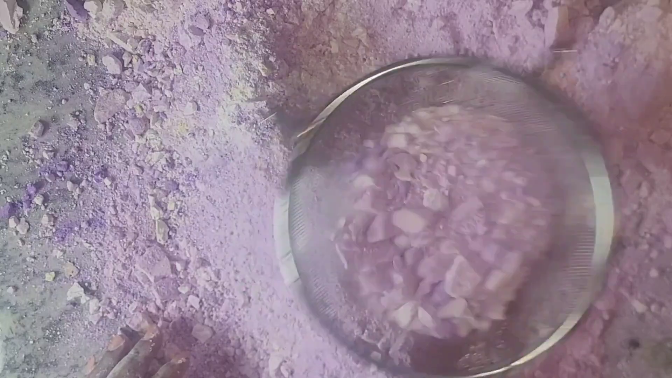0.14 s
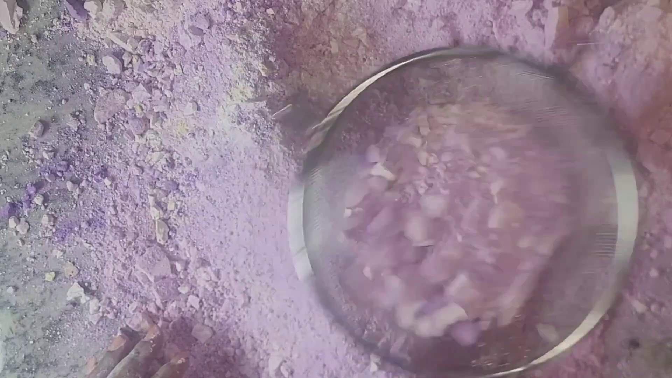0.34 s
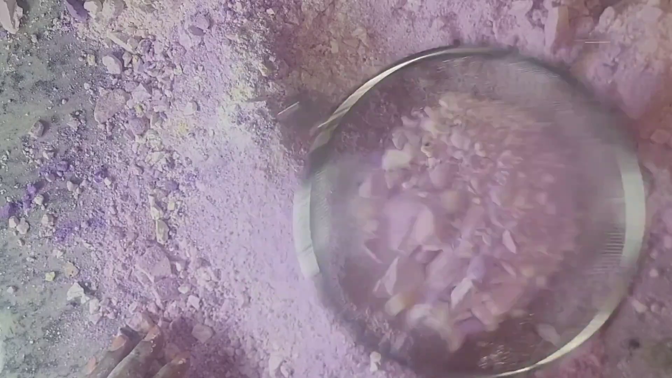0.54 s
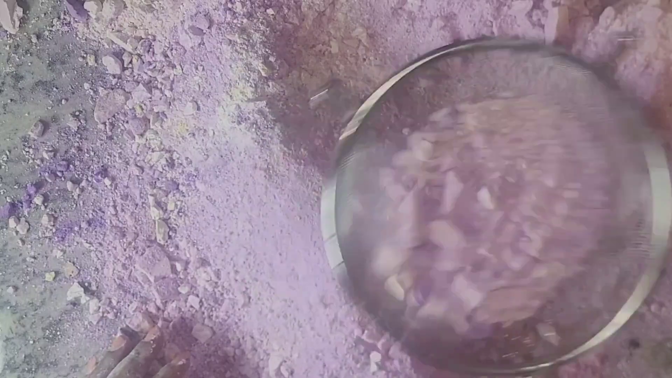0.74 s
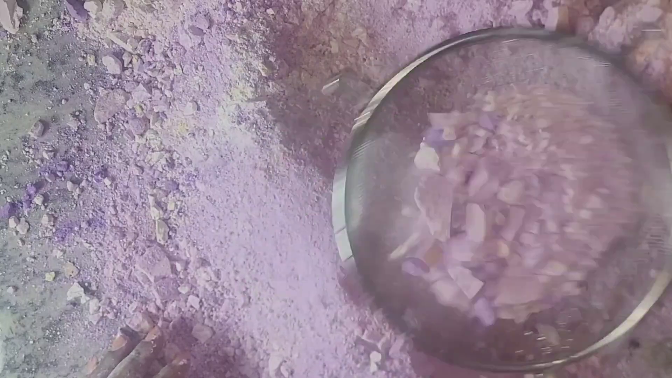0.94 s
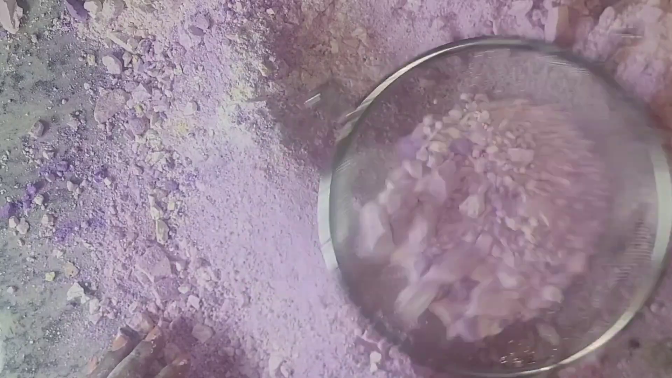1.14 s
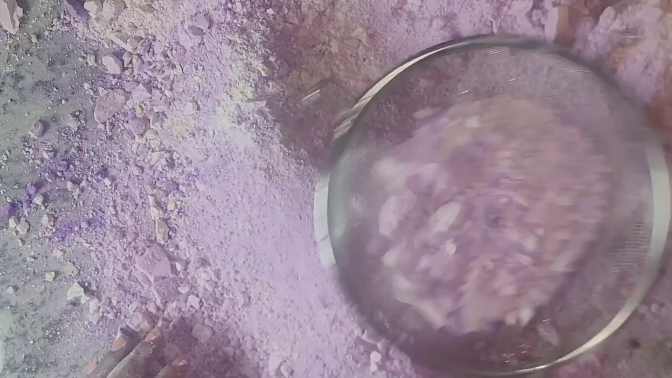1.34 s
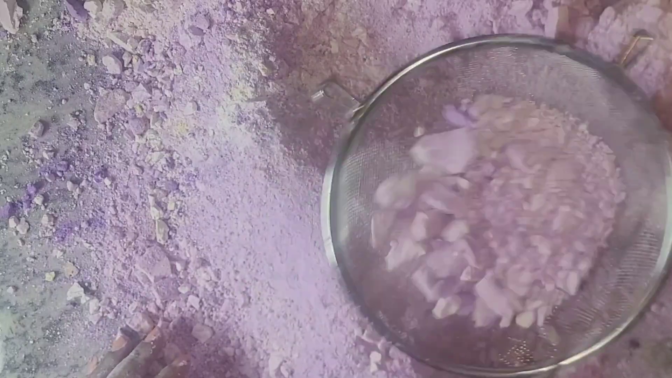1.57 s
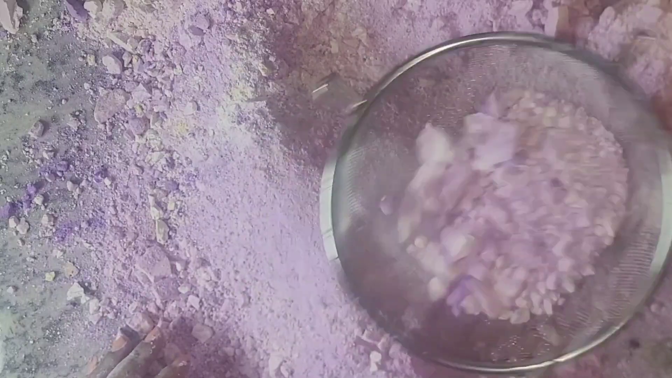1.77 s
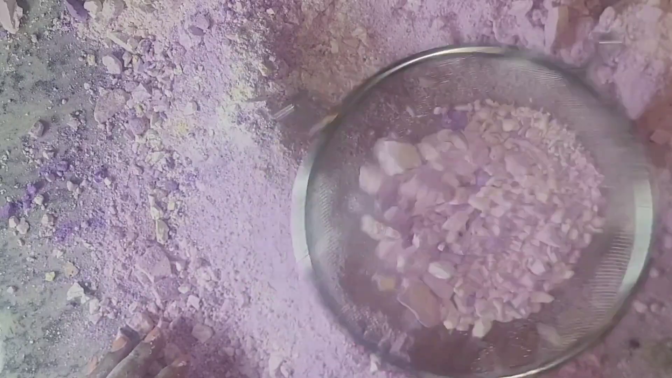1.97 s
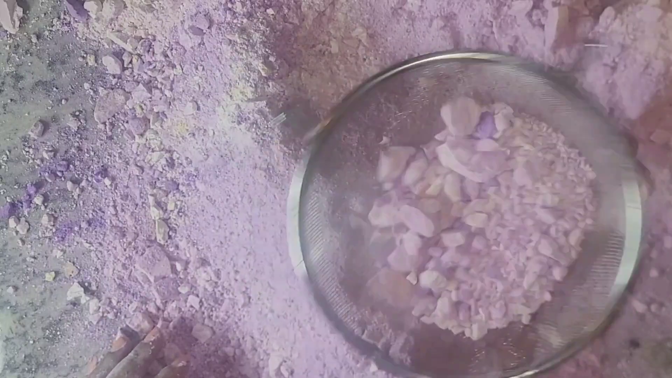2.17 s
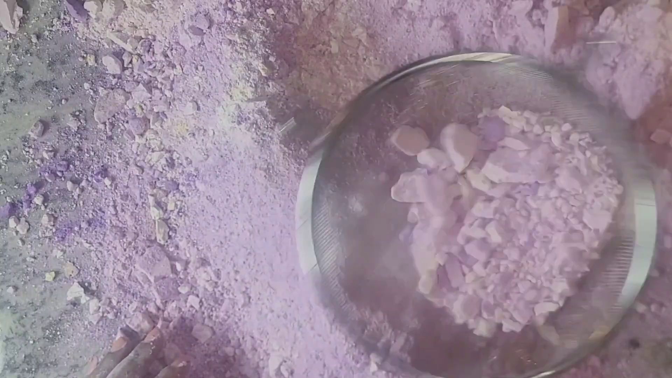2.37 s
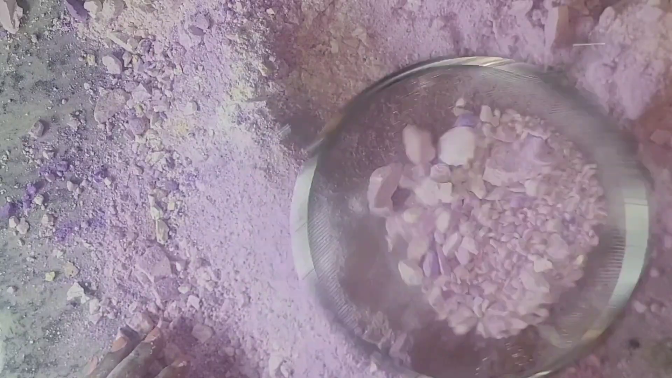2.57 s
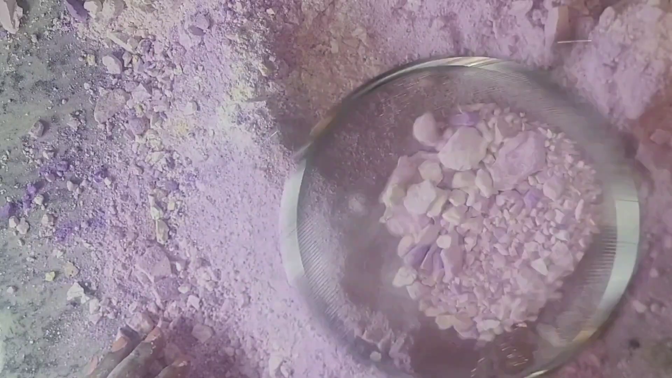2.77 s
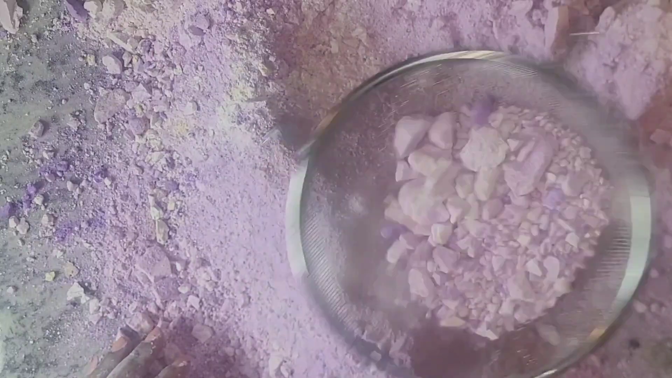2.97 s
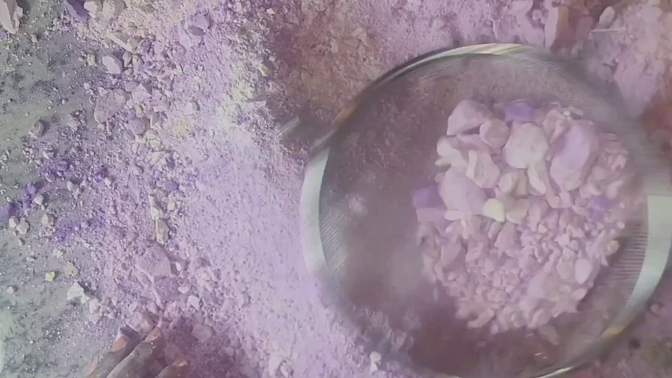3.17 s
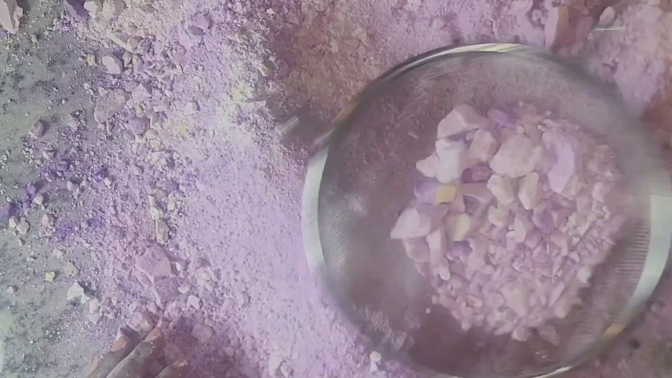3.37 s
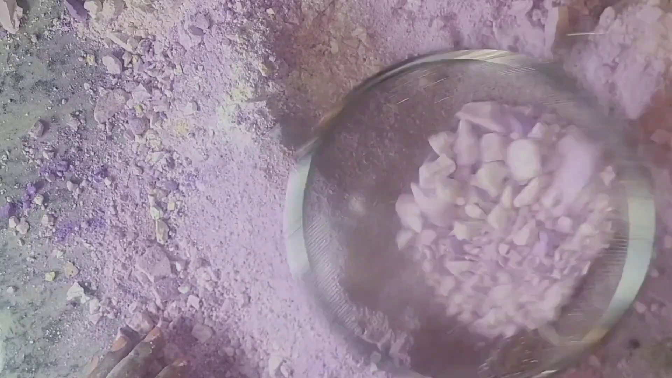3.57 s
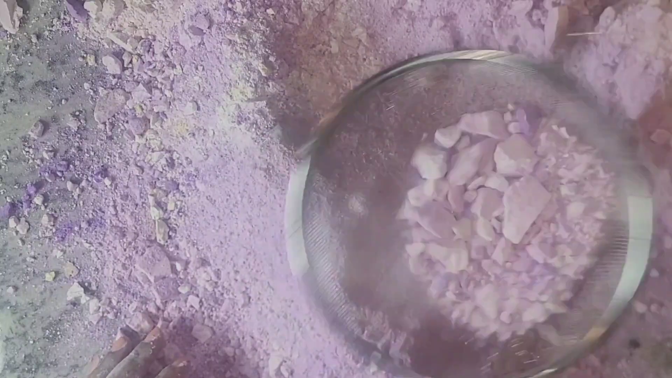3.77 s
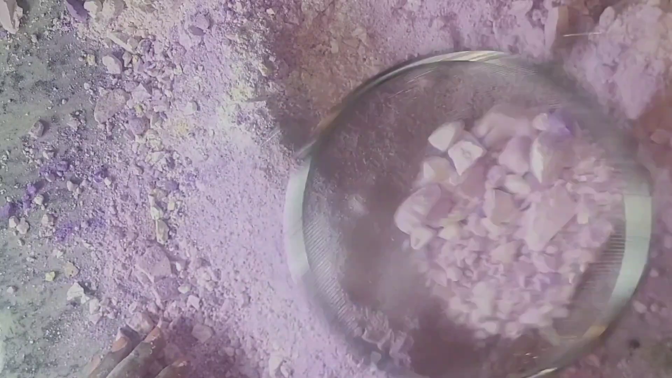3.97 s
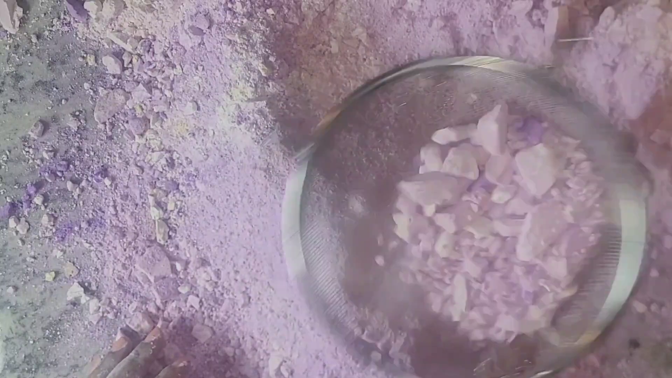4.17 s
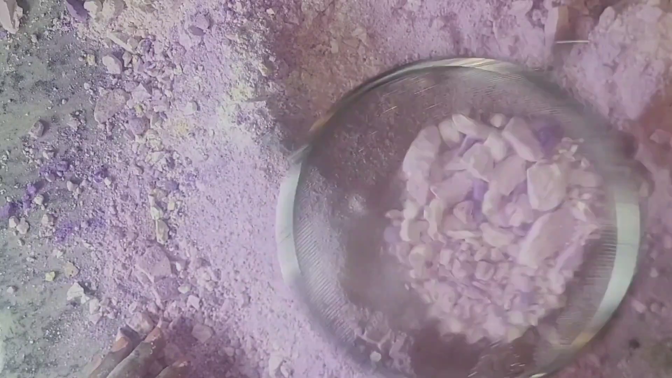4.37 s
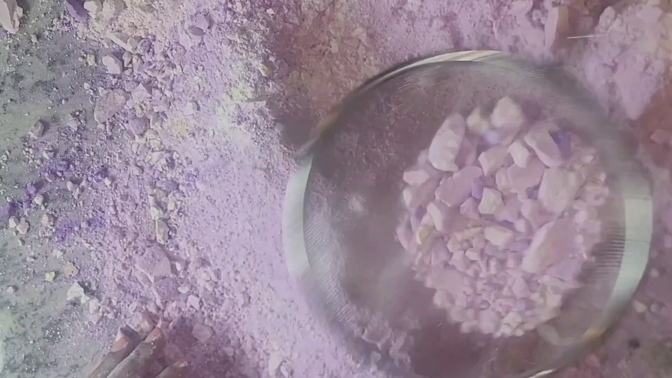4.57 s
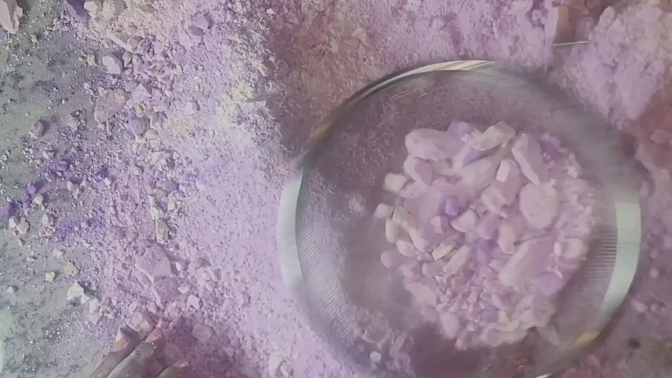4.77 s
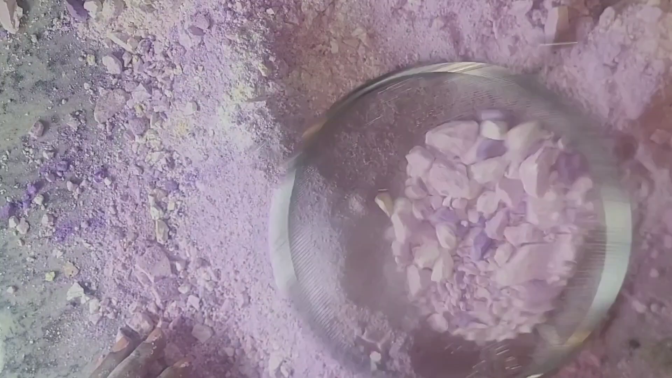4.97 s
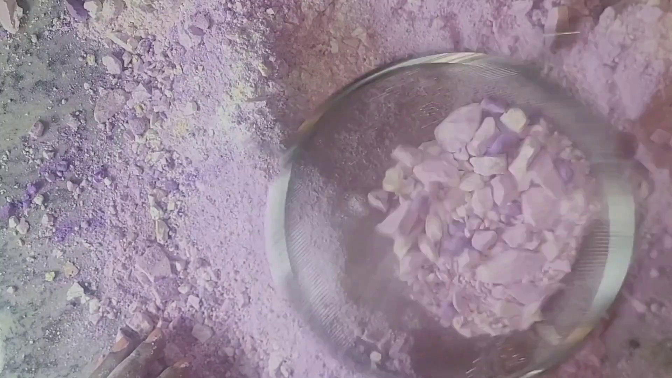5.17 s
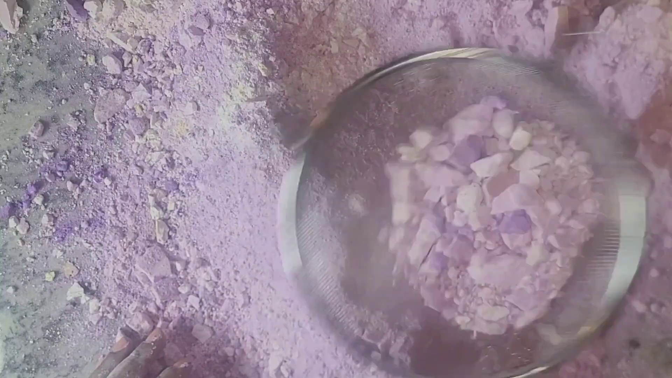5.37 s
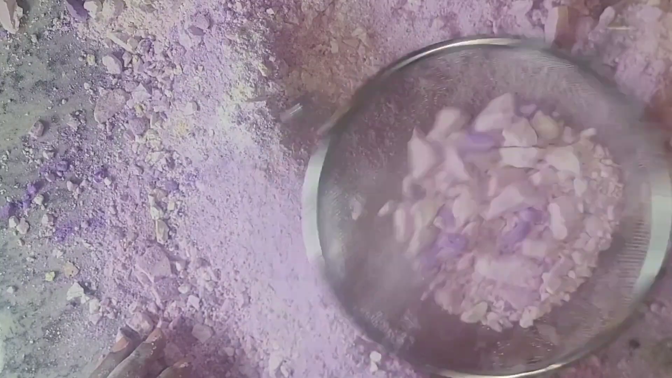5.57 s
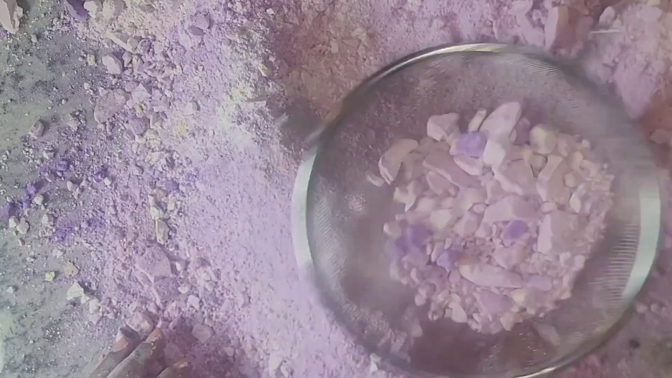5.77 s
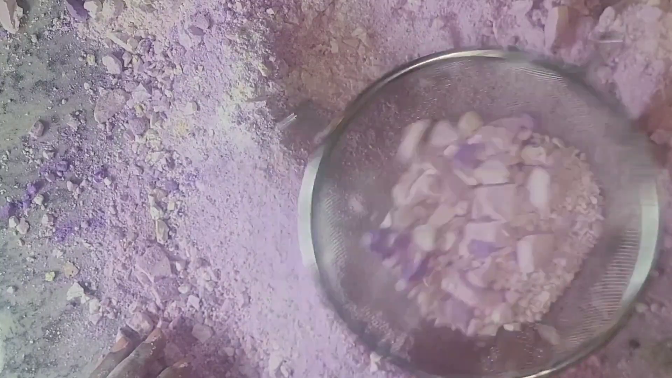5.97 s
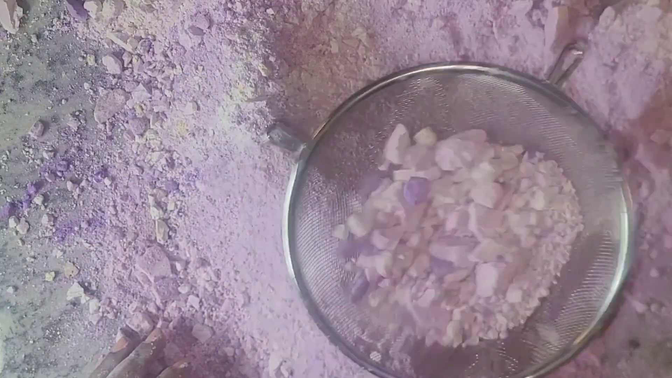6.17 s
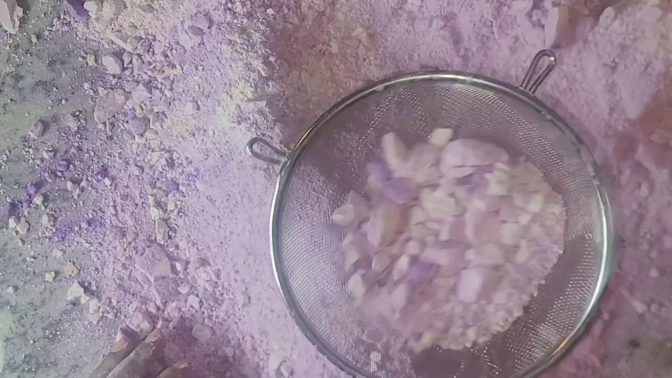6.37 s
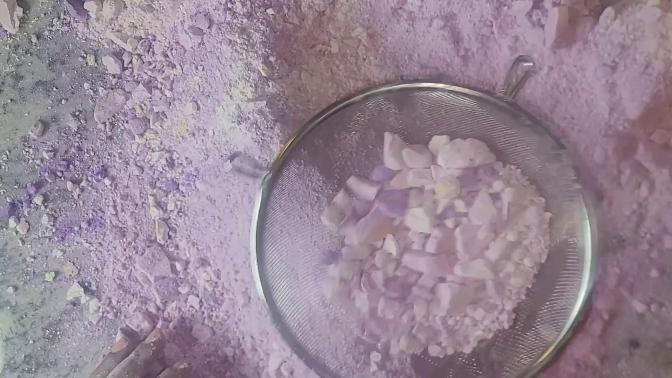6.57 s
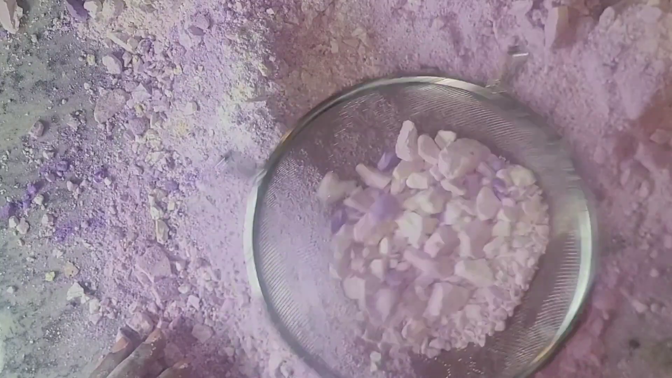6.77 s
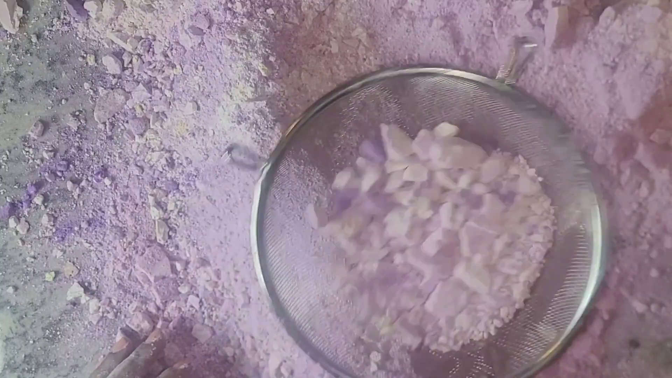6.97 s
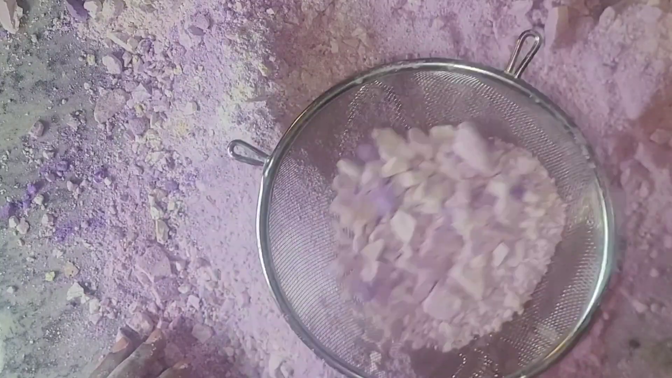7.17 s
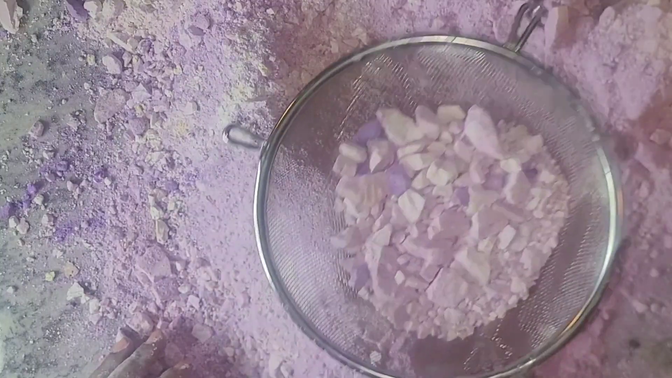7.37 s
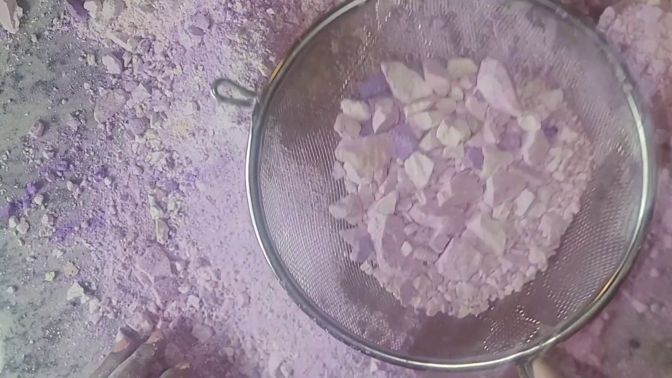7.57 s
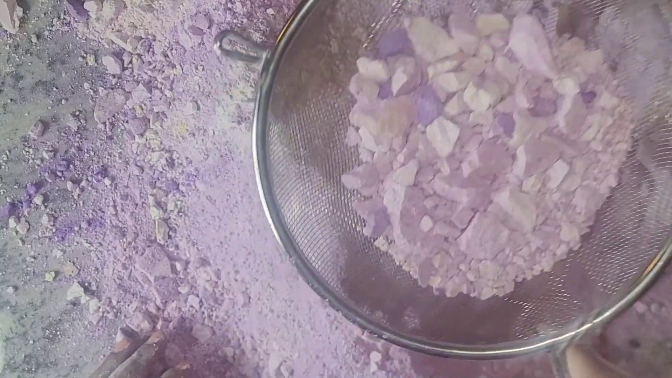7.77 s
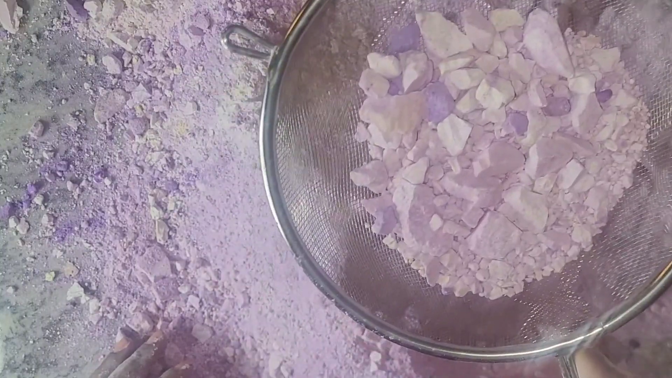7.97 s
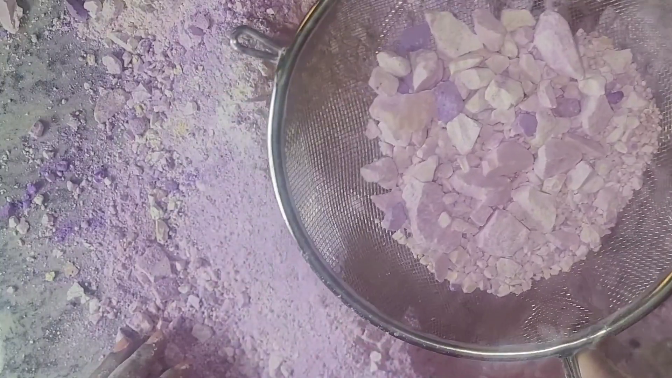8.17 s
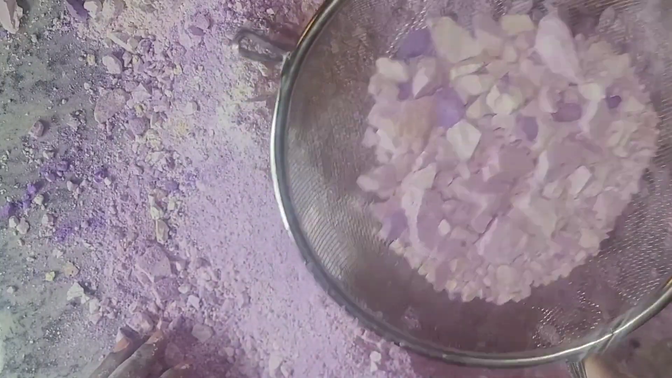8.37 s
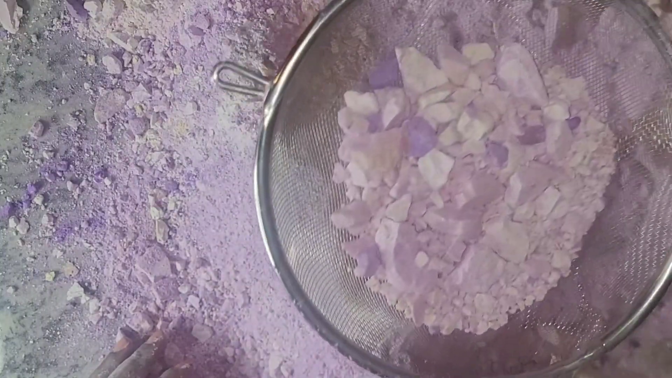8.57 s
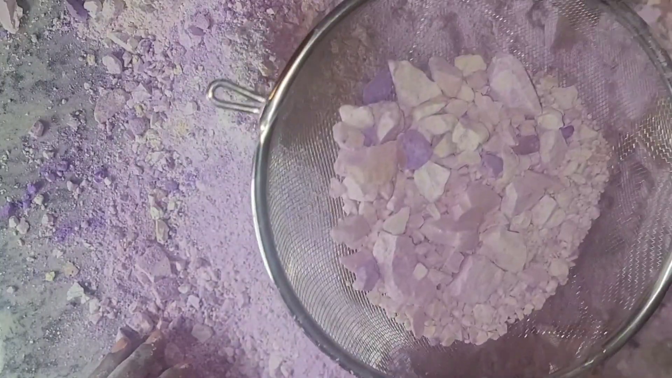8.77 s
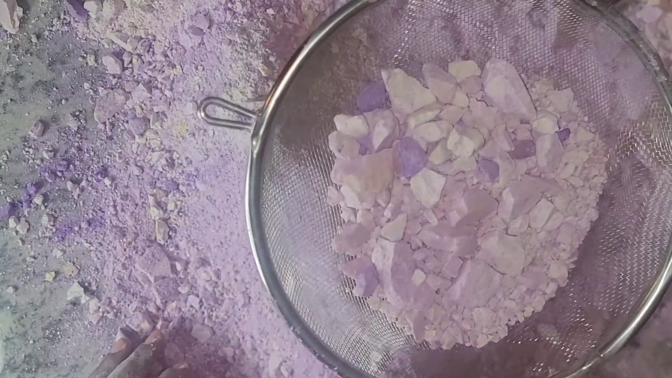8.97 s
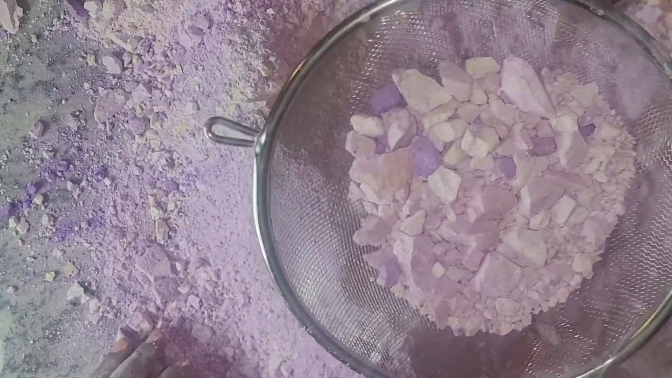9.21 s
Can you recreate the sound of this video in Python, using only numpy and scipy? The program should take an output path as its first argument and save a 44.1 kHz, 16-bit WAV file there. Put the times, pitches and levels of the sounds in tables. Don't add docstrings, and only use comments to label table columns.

```python
import sys
import numpy as np
from scipy import signal
from scipy.fft import rfft, irfft, next_fast_len
from scipy.io import wavfile
from scipy.ndimage import uniform_filter1d

SR = 44100
rng = np.random.default_rng(int(sys.argv[2]) if len(sys.argv) > 2 else 0)


def log_audio(samples):
    frames = np.atleast_2d(samples).T
    limited = np.clip(frames, -1, 1)
    pcm = np.round(limited * 32767).astype(np.int16)
    wavfile.write(sys.argv[1], SR, pcm)


def invert_db(x):
    u = np.asarray(x, float) / 20
    return 10 ** u


N = 407484
TIME = np.arange(N) / SR


def rms_one(x):
    return x / np.sqrt(np.mean(np.atleast_2d(x)[0] ** 2) + 1e-20)


def colour(x, points):
    size = next_fast_len(N)
    hz, level = np.transpose(points)
    log_hz = np.log(np.fft.rfftfreq(size, 1 / SR) + 1)
    gain = invert_db(np.interp(log_hz, np.log(hz), level))
    return irfft(rfft(x, size) * gain, size)[..., :N]


def drift(rate):
    r = np.exp(-80 * np.pi * rate / SR)
    noise = rng.standard_normal(N // 40 + 2002)
    slow = signal.lfilter([1], [1, -2 * r, r * r], noise)[2000:]
    return np.interp(np.arange(N) / 40, np.arange(len(slow)), rms_one(slow - slow.mean()))


def ring(clicks, hz, t60):
    r, w = invert_db(-60 / (t60 * SR)), 2 * np.pi * hz / SR
    return signal.lfilter([0, np.sin(w)], [1, -2 * r * np.cos(w), r * r], clicks + 1e-18)


def grains(per_s, spread_db, side_db):
    chance, size, sign = rng.random((3, N))
    height = invert_db(-spread_db * np.log(size + 0.0063)) * np.sign(sign - .5)
    hits = np.where(chance < per_s / SR, height, 0)
    return rms_one(np.array([hits, hits * invert_db(side_db) * rng.standard_normal(N)]))


# (pitch [Hz], level [dB], wander [Hz])
HUM = [(120.0, -34.5, .35), (59, -51, 1.5), (209, -59, 1.5), (292, -63, 1.5), (39, -62, 2.5)]
# (pitch [Hz], level [dB per Hz])
RUMBLE = [(12, -46), (22, -36), (45, -8.5), (60, -7), (86, -5.5), (140, -6.5), (200, -42.5)]
# (pitch [Hz], level [dB per Hz])
AIR = [(100, -50), (160, 2.5), (250, 1.5), (400, -11), (630, -6), (1000, -21.5), (2000, -19.5),
       (4000, -24.5), (8000, -29), (13000, -62), (15500, -29)]
# (pitch [Hz], side minus mid [dB])
WIDTH = [(30, -32), (150, -70), (250, -31), (700, -13), (1290, -12), (2380, -13), (4400, -7), (8120, -5.5),
         (15000, -6)]


def background():
    hum = np.zeros(N)
    for hz, level, wander in HUM:
        gain = np.sqrt(2) * invert_db(level + 0.73 * drift(3.5))
        hum += gain * np.sin(2 * np.pi * np.cumsum(hz + wander * drift(5.29)) / SR)
    white = rng.standard_normal((2, 2, N))
    rumble = invert_db(-45) * rms_one(colour(white[0], RUMBLE))
    air = invert_db(-50.5) * rms_one(colour(white[1], AIR))
    noise = rumble + air
    return np.array([hum + noise[0], colour(noise[1], WIDTH)])


# (start [s], end [s], trill pitch [Hz], level [dB])
INSECT = [(-.1, .13, 14050, -55), (.18, .42, 14050, -54), (.47, .76, 14050, -56), (.775, 1.01, 14050, -54),
          (1.2, 1.37, 14080, -54), (1.46, 1.67, 14100, -54), (2.135, 2.28, 14050, -53),
          (2.31, 2.55, 14050, -55), (2.66, 2.9, 14080, -54), (3.29, 3.52, 14080, -52),
          (3.57, 3.82, 14060, -55), (3.86, 4.13, 14050, -55), (4.17, 4.42, 14080, -54),
          (8.203, 8.39, 14540, -56), (8.459, 8.738, 14050, -53), (8.759, 9.047, 14050, -53),
          (9.068, 9.19, 14200, -51)]
# (time [s], offset from trill pitch [Hz])
SWOOP = [(0, 350), (.016, -1150), (.046, -450), (.05, -1)]
# (start [s], end [s], first pitch [Hz], last pitch [Hz], level [dB])
GLIDES = [
    (8.39, 8.43, 14750, 13650, -56),
    (9.19, 9.207, 13900, 14550, -53),
    (9.207, 9.24, 14550, 13850, -53),
]


def insect(depth_hz=420, edge_s=.004, trills_per_s=38.):
    hz, gain = np.full(N, 14000.), np.zeros(N)
    dip_s, dip_hz = np.transpose(SWOOP)
    for start, end, pitch_hz, level in INSECT:
        on = slice(*np.searchsorted(TIME, [start, end]))
        t = TIME[on] - start
        stroke = (np.maximum(t - dip_s[-1], 0) * trills_per_s) % 1
        trill_hz = (t > dip_s[-1]) * depth_hz * (.5 - stroke)
        hz[on] = pitch_hz + np.interp(t, dip_s, dip_hz) + trill_hz
        gain[on] = invert_db(level - 3.5 * (t < dip_s[-1]) - 2.2 * stroke)
    for start, end, first_hz, last_hz, level in GLIDES:
        on = (TIME >= start) & (TIME < end)
        hz[on] = np.interp(TIME[on], [start, end], [first_hz, last_hz])
        gain[on] = invert_db(level)
    hz = uniform_filter1d(hz, size=131) + 45 * drift(140)
    gain = uniform_filter1d(gain, size=round(edge_s * SR)) * invert_db(1.6 * drift(90))
    return np.sqrt(2) * gain * np.sin(2 * np.pi * np.cumsum(hz) / SR)


# (time [s], level [dB])
DUST = [(7.25, -70), (7.55, -66), (8.0, -78), (8.9, -70), (9.0, -57), (9.07, -52), (9.24, -49.5)]
# (pitch [Hz], level [dB per Hz])
DUST_COLOUR = [(1200, -30), (2500, -11), (4000, -7.5), (7000, -7), (10900, -11), (15500, -21)]
# (time [s], level [dB])
FALL = [(0.0, -45.5), (.45, -46.5), (1.0, -48.5), (4.7, -51), (6.9, -51.5), (7.3, -50), (7.67, -56.5),
        (9.24, -55)]
# (pitch [Hz], level [dB per Hz])
FALL_COLOUR = [(150, -36), (280, -3.5), (370, 2.5), (550, -7), (850, -5), (1000, -6.5), (1500, -11),
               (3000, -30)]


def powder():
    s, level = np.transpose(DUST)
    dust = rms_one(colour(grains(15000, spread_db=2.0, side_db=-29), DUST_COLOUR))
    dust = dust * invert_db(np.interp(TIME, s, level, left=-120))
    s, level = np.transpose(FALL)
    fall = rms_one(colour(grains(6000, spread_db=1.5, side_db=-16.5), FALL_COLOUR))
    return dust + fall * invert_db(np.interp(TIME, s, level) - 0.5)


# (time [s],
# out peak [dB], back delay [ms], back peak [dB], throw against the rim [dB])
SWINGS = [(0.028, -30.5, 92, -39, -4), (0.227, -33, 86, -34, -1.5), (0.426, -28, 87.5, -33, -4.5),
          (0.629, -31, 73, -33.5, -4.5), (0.822, -32, 84, -39, -2), (1.024, -31, 90, -32.5, -6),
          (1.215, -31.5, 77, -35.5, -2), (1.414, -31, 86, -34.5, -5.5), (1.62, -31, 51, -34, -0.5),
          (1.808, -30, 88, -30.5, -4.5), (2.005, -33.5, 83, -36.5, -1.5),
          (2.196, -33.5, 71, -37.5, -2.5), (2.387, -30, 91, -31.5, -3.5),
          (2.586, -29.5, 79, -32.5, -6), (2.786, -30.5, 83, -33.5, -2), (2.981, -32, 83, -37, -1.5),
          (3.177, -30.5, 96, -33, -8), (3.378, -34, 81, -38.5, -2),
          (3.57, -30.5, 92, -33.5, -3.5), (3.77, -32.5, 84, -35.5, -2.5), (3.971, -32, 87, -34, -4),
                 (4.175, -32, 81, -36.5, -3), (4.372, -32, 88, -35, -5), (4.574, -30.5, 92, -33, -1.5),
                 (4.777, -31.5, 85, -35.5, -2.1), (4.973, -29.5, 87, -33.5, -7),
                 (5.181, -29.5, 83, -34, -7), (5.384, -31, 93, -35, -4), (5.591, -31, 90, -36.5, -7.5),
                 (5.797, -32, 89, -35.5, -0.8), (6.004, -29, 93, -33.5, -4.5),
                 (6.217, -34.5, 77, -39.5, -4), (6.418, -32.5, 80, -38, -2.5), (6.614, -35.5, 71, -39, -4),
                 (6.802, -35.5, 82, -37, 3), (7.007, -34.5, 78, -38, 0.5), (7.2, -47.5, 49, -55, 0)]


def shaking():
    start, out_db, delay_ms, back_db, throw_db = np.transpose(SWINGS)
    s = np.ravel([start, start + delay_ms / 1000], order="F")
    peak = np.ravel([out_db, back_db], order="F")
    back = np.arange(len(s)) % 2 == 1
    usual_db, weakest_db = -33, -41
    weak = usual_db - np.maximum(peak, weakest_db)
    stroke_ms = np.where(back, 55, 34.8) + np.where(back, 3, -0.2) * weak
    half = stroke_ms / 2000
    pair = .5 * (peak + np.append(peak[1:], peak[-1]))
    lull = usual_db + np.where(back, -15, -10) + .6 * (pair - usual_db)
    lull = np.minimum(lull, pair - 5.0)
    following = np.append(s[1:] - half[1:], s[-1] + .2)
    middle = .5 * (s + half + following)
    times = np.array([s - half, s - 0.65 * half, s + 0.6 * half, s + half, middle]).T.ravel()
    levels = np.array([peak - 5.0, peak - .6, peak - .6, peak - 5.0, lull]).T.ravel()
    order = np.argsort(times)
    grit_db = np.interp(TIME, times[order], levels[order])
    grit_db -= 60 * np.clip(TIME - s[-1] - .05, 0, None)
    rim_db = np.where(back, -8 + 0.26 * weak, throw_db.repeat(2))
    chunk_db = np.where(back, -6.5, -14.5) + 0.36 * weak
    return grit_db, np.interp(TIME, s, rim_db), np.interp(TIME, s, chunk_db)


def crunch(per_s=350, cycles=7.7):
    cracks = grains(per_s, spread_db=0.0, side_db=-20)[0]
    dealt = rng.integers(0, 12, N)
    pitches = np.geomspace(1900, 8000, num=12)
    return rms_one(sum(ring(cracks * (dealt == k), hz, cycles / hz) for k, hz in enumerate(pitches)))


# (pitch [Hz], level [dB per Hz])
GRIT = [(900, -44), (1500, -26.5), (2300, -6.5), (2940, -7.5), (4140, -5), (4530, -8.5), (6070, -5),
        (8000, -7.5), (10300, -13), (14100, -13), (15500, -17)]
# (pitch [Hz], level [dB], time to fade by 60 dB [s])
RIM = [(2180, -18, 0.023), (2250, 1.5, 0.048), (2318, 2, 0.033), (2566, 0, 0.039), (2700, -14, .7),
       (2646, -23, 0.63), (4235, 2, 0.025), (4740, -1.5, 0.029), (1800, -28, 0.018)]
# (pitch [Hz], level [dB per Hz])
CHUNKS = [(250, -7.5), (450, -6), (746, -10.5), (900, -0.5), (1150, -2), (1350, -6.5), (1750, -2.5),
          (2100, -5.5), (3500, -18.5)]


def sieve():
    grit_db, rim_db, chunk_db = shaking()
    contacts = grains(14000, spread_db=2.0, side_db=-21)
    grit = rms_one(colour(contacts, GRIT)) * invert_db(grit_db + 1.66 * drift(25))
    grit[0] += crunch() * invert_db(grit_db - 11.5)

    blows = grains(2200, spread_db=2.5, side_db=-31) * invert_db(grit_db + rim_db - 2.5)
    rim, power = 0, 0
    for hz, level, t60 in RIM:
        loaded_t60 = min(t60, .07)
        rim = rim + invert_db(level + 2.5 * drift(8)) * ring(blows, hz, loaded_t60)
        power += invert_db(2 * level) * loaded_t60
    rim = rim / np.sqrt(power * SR / (4 * np.log(1000)))

    slow_db = uniform_filter1d(grit_db, size=1301)
    chunks = rms_one(colour(grains(2500, spread_db=1.0, side_db=-28), CHUNKS))
    chunks = chunks * invert_db(slow_db + chunk_db + 2.5)

    rest_s, rest_db, fade_db_per_s = 7.17, -58, 26
    crumbs = grains(700, spread_db=2.0, side_db=-30)
    singing = rms_one(sum(ring(crumbs, hz, .03) for hz, level, t60 in RIM if t60 > .4))
    singing = singing * (TIME > rest_s) * invert_db(rest_db - fade_db_per_s * np.abs(TIME - rest_s))
    return grit + rim + chunks + singing


# (time [s], peak level [dB], pitch [Hz], length of ring [cycles])
KNOCKS = [(0.1118, -23, 1150, 10), (.1135, -25, 800, 11), (.115, -23, 1710, 9.7), (1.131, -18, 4500, 6.),
          (1.390, -24, 2250, 15), (1.67, -23, 6000, 7.), (3.520, -27, 9000, 6.), (4.406, -21, 7000, 6.),
          (4.886, -28, 5500, 7.), (5.921, -13, 7000, 4.4), (6.204, -31, 2220, 14.),
          (6.2651, -16.5, 8050, 9.), (7.182, -39, 2190, 9.), (7.194, -31, 3500, 5.9),
          (7.241, -37, 1500, 6.), (7.271, -40, 2780, 9.), (7.333, -37, 5000, 6.), (7.376, -43, 6000, 6.)]
# (time [s], peak level [dB], pitch [Hz])
THUDS = [(0.289, -35, 1060), (0.471, -30, 930), (0.5, -28, 980), (0.81, -33, 594), (0.997, -36, 1010),
         (1.071, -31, 1140), (1.489, -38, 910), (2.238, -30, 920), (2.853, -32, 1150), (3.969, -34, 888),
         (4.183, -38, 686), (4.578, -39, 902), (4.85, -31, 1100), (5.244, -48, 1150), (5.379, -38, 805),
         (6.045, -35, 961), (6.113, -29, 1090), (6.413, -39, 1580), (6.61, -38, 915), (6.678, -34, 1090),
         (6.792, -43, 1690)]


def knocks():
    out, click = np.zeros(N), np.eye(1, 1500)[0]
    thuds = [(s, level - 0.5, hz, 14.) for s, level, hz in THUDS]
    for s, level, hz, cycles in KNOCKS + thuds:
        at = round(s * SR)
        tone = ring(click, hz, cycles / hz)
        overtone = .45 * ring(click, 1.8 * hz, 0.33 * cycles / hz)
        out[at:at + 1500] += invert_db(level) * (tone + overtone)
    return out


# (time [s], peak level [dB], pitch [Hz])
DRIPS = [
    (2.11, -24, 1850),
    (8.6455, -39, 1960),
    (8.65, -30.5, 1870),
    (8.6585, -37, 1920),
    (8.6655, -32.5, 1890),
    (8.676, -35, 1980),
    (8.684, -36, 1910),
]
# (multiple of its pitch, level [dB])
DRIP_OVERTONES = [(.8, -15), (1, 4.5), (1.12, -10), (1.38, -12), (1.5, -10.5), (1.75, -14), (1.92, -14.5),
                  (2.45, -24), (3.1, -20)]


def drips(rise_s=0.0036, t60=0.024, first_db=-30):
    out, t = np.zeros(N), np.arange(6000) / SR
    shape = (1 - np.exp(-t / rise_s)) * invert_db(-60 * t / t60)
    for s, level, hz in DRIPS:
        dulling_db = 0.57 * min(level - first_db, 0)
        tone = np.zeros(len(t))
        for k, gain in DRIP_OVERTONES:
            fading_db = gain + (k > 1) * dulling_db - 180 * (k - 1) * t
            tone += invert_db(fading_db) * np.sin(2 * np.pi * k * hz * t)
        at = round(s * SR)
        out[at:at + len(t)] += invert_db(level - 4.0) * tone * shape / shape.max()
    return out + room(out, t60=.43, level_db=-8)[0]


def room(x, t60=0.18, level_db=-17):
    t = np.arange(round(.4 * SR)) / SR
    tail = rng.standard_normal((2, len(t))) * invert_db(-60 * t / t60) * (t > .006)
    tail = tail / np.sqrt(np.sum(tail[0] ** 2)) * invert_db([[level_db], [level_db - 27]])
    return signal.fftconvolve(x[None], tail, axes=1)[:, :N]


def scene():
    near, far = sieve() + powder(), drips()
    near[0] += knocks() + insect()
    mid, side = near + room(near[0] + invert_db(5) * far) + background()
    return np.array([mid + far + side, mid + far - side])


def low_pass(x):
    return signal.sosfilt(signal.butter(12, 16000, fs=SR, output="sos"), x)


def record(dry):
    top_hz, block, first = 15060, 1024, 623
    hz = np.fft.rfftfreq(N, 1 / SR)
    spectra = rfft([dry[0] + dry[1], dry[0] - dry[1]]) / 2
    mid, side = irfft(spectra * (hz < top_hz), N)
    centres = np.arange(first, N, block)
    treble = irfft(spectra[0] * (hz > 2000) * (hz < 12000), N)
    level = 10 * np.log10(uniform_filter1d(treble ** 2, size=block)[centres] + 1e-12)
    quiet, falling = level < -54, np.diff(level, prepend=0) < -.5
    chance = rng.random((2, len(centres)))
    keep_high = quiet | (chance[0] < np.where(falling, .42, .1))
    keep_low = chance[1] < np.where(keep_high & ~quiet, .65, .17)
    leak = invert_db(np.where(quiet, -23, -15))
    errors = mid * drift(40) * np.interp(np.arange(N), centres, leak)
    kept = irfft(rfft(side) * (hz >= 190) * (hz < 1400), N)
    for keep, band, share in ((keep_low, hz < 190, .5), (keep_high, hz >= 1400, 1)):
        gate = np.clip(2 * np.interp(np.arange(N), centres, keep) - .5, 0, 1)
        kept += gate * irfft(rfft(side + share * errors) * band, N)
    return low_pass(np.array([mid + kept, mid - kept]))


dry = scene()
out = record(dry)
log_audio(out)
```